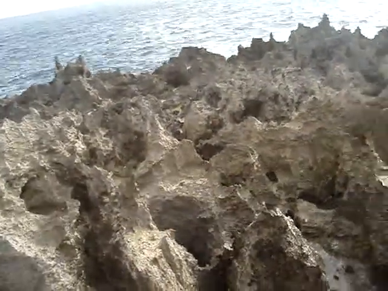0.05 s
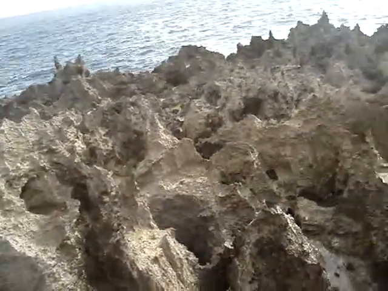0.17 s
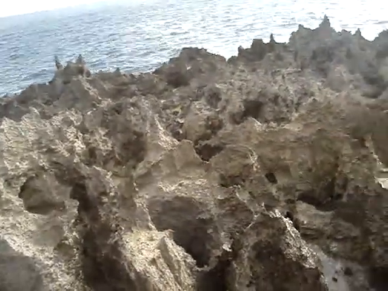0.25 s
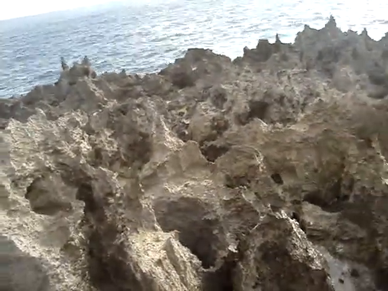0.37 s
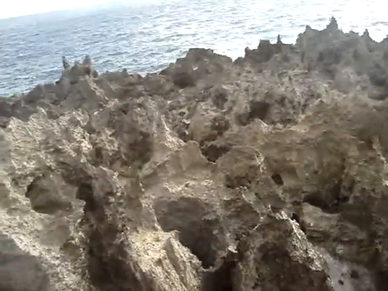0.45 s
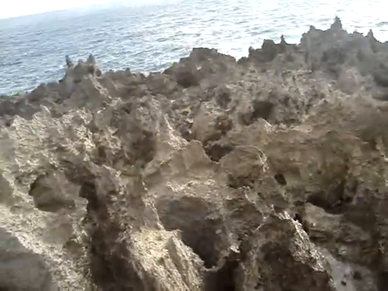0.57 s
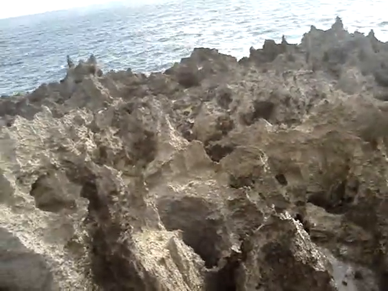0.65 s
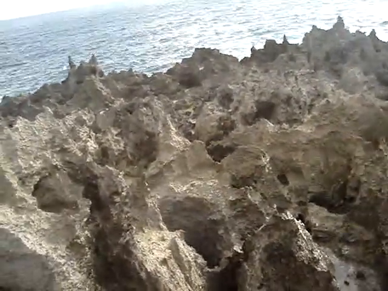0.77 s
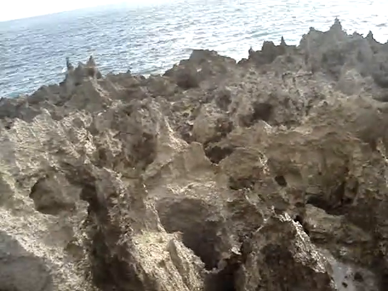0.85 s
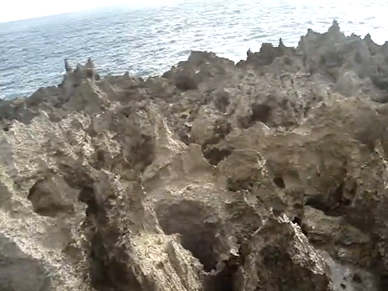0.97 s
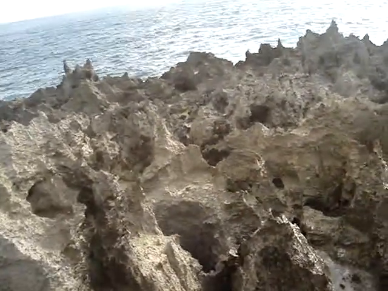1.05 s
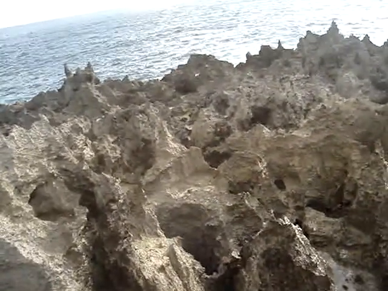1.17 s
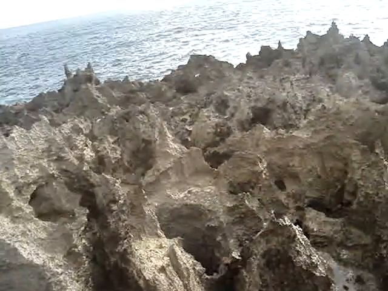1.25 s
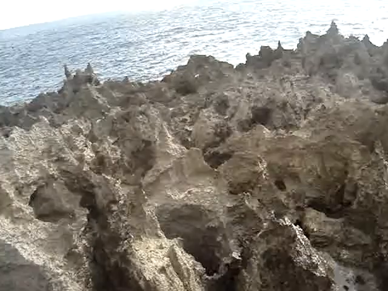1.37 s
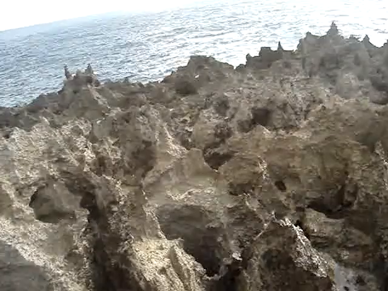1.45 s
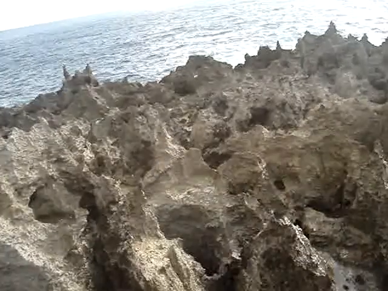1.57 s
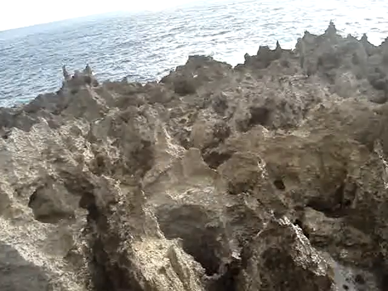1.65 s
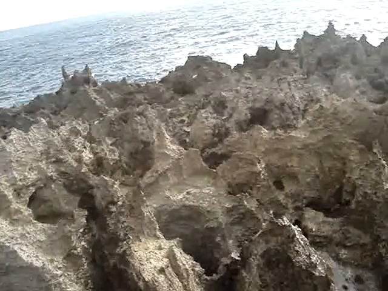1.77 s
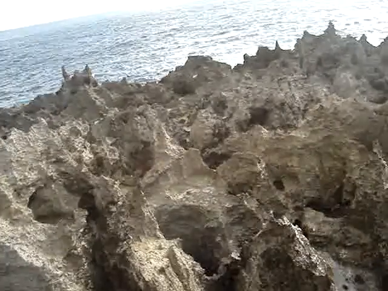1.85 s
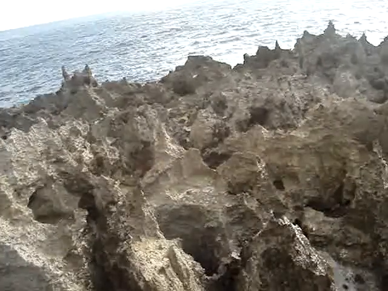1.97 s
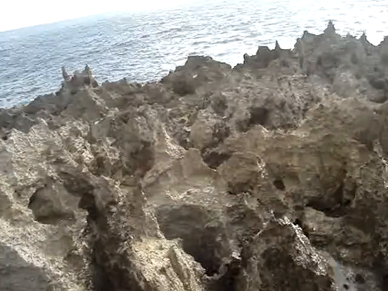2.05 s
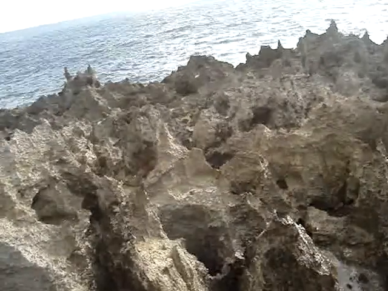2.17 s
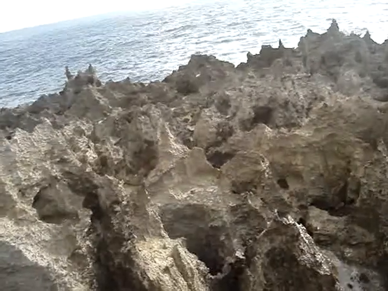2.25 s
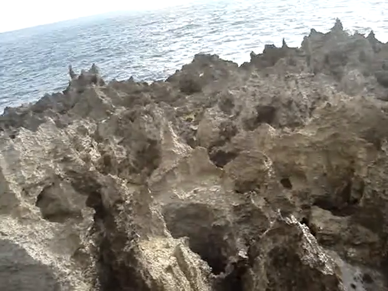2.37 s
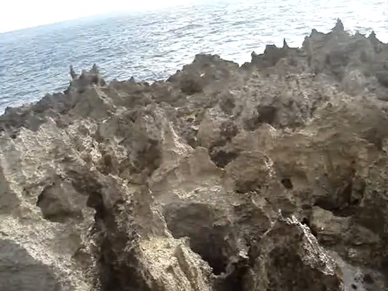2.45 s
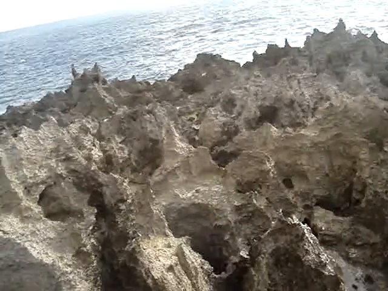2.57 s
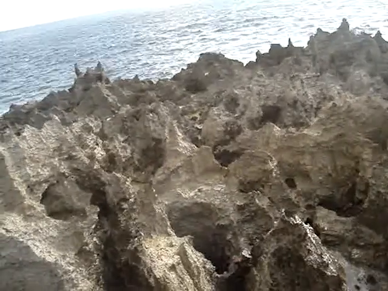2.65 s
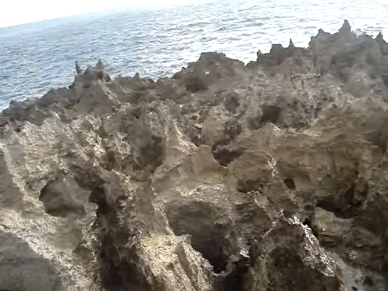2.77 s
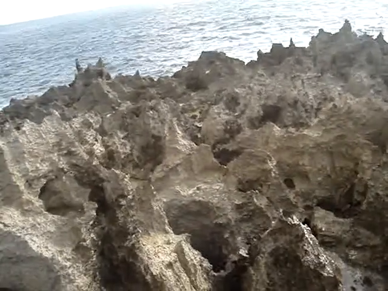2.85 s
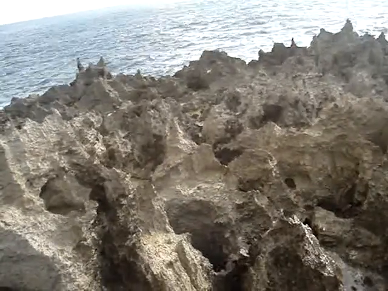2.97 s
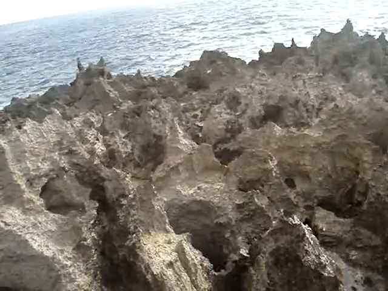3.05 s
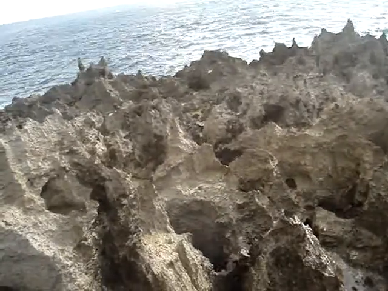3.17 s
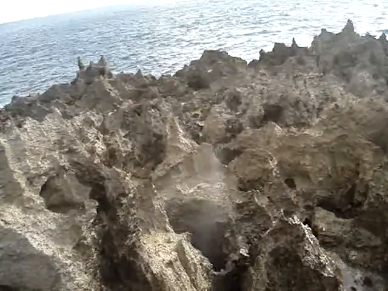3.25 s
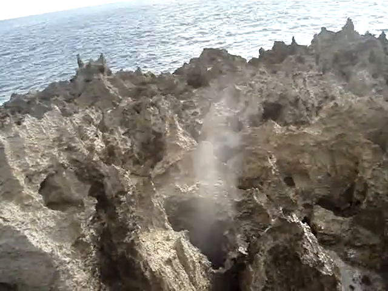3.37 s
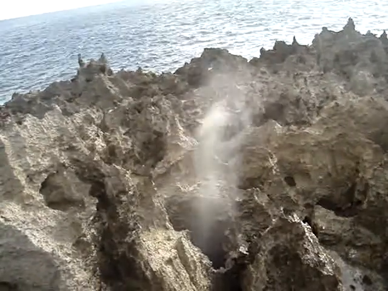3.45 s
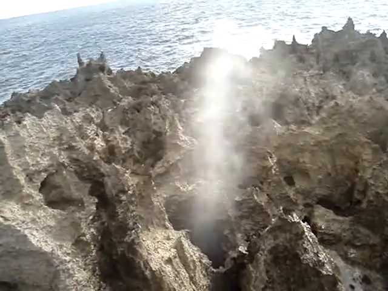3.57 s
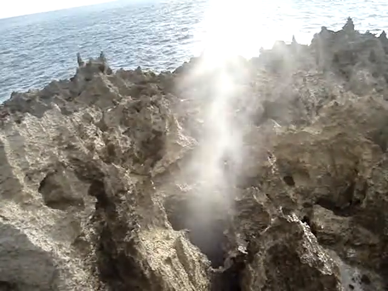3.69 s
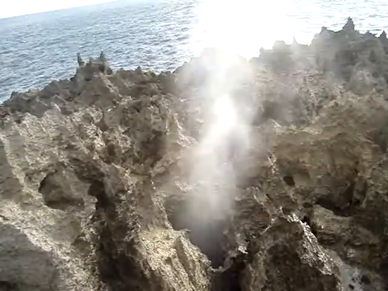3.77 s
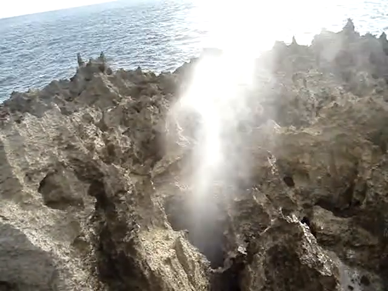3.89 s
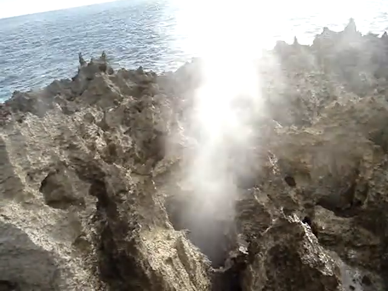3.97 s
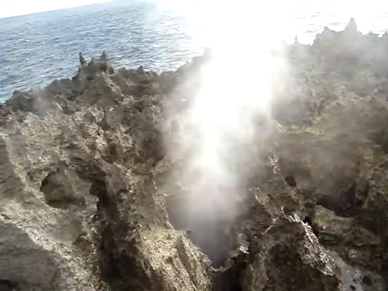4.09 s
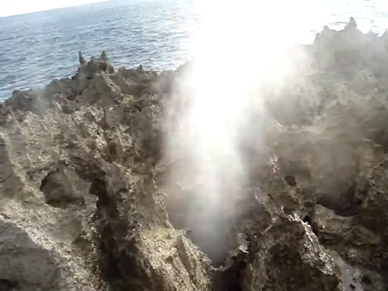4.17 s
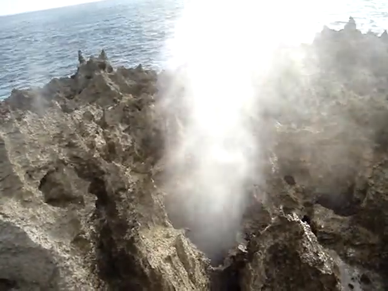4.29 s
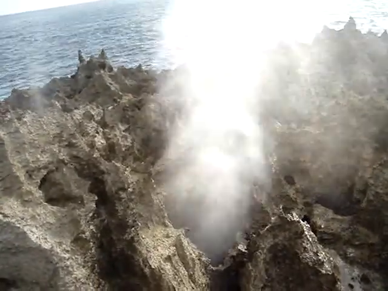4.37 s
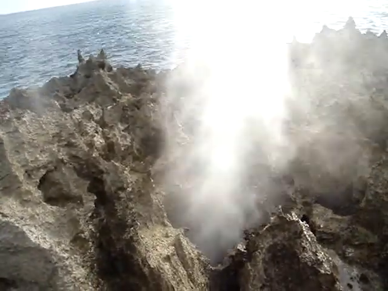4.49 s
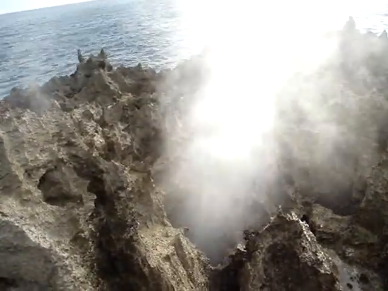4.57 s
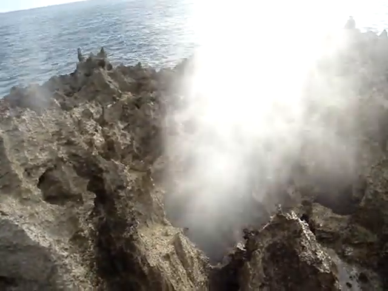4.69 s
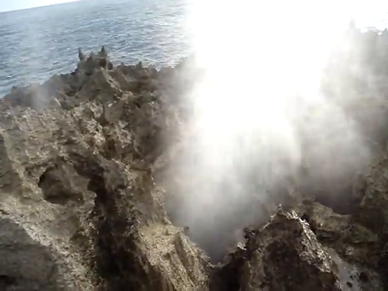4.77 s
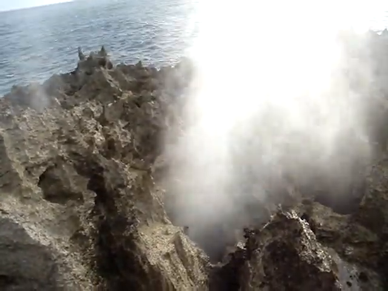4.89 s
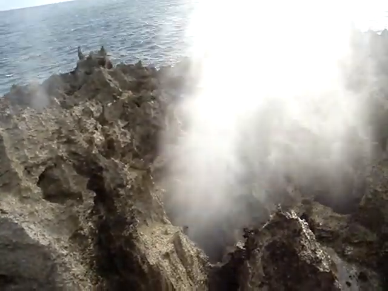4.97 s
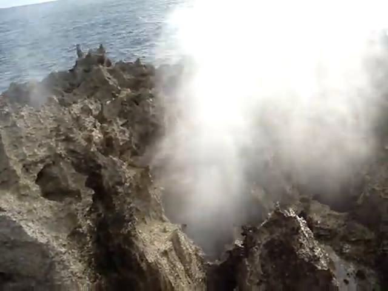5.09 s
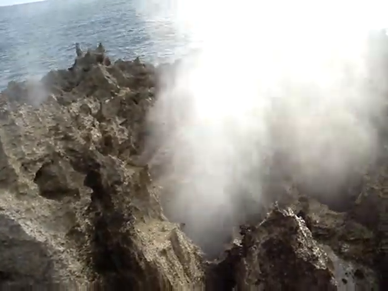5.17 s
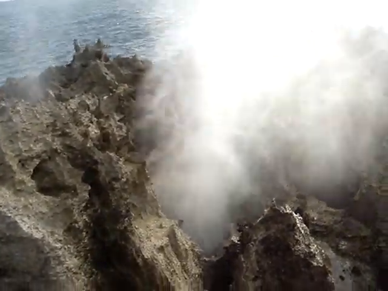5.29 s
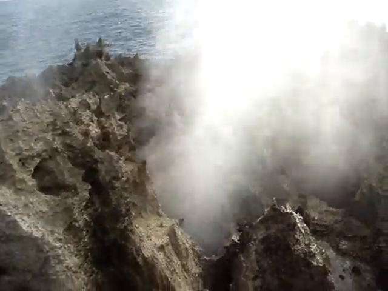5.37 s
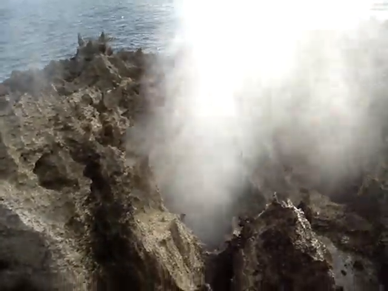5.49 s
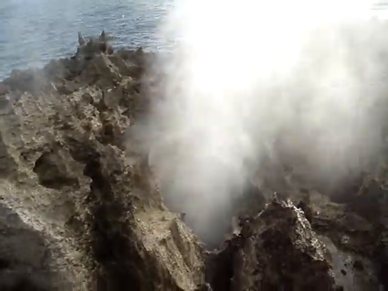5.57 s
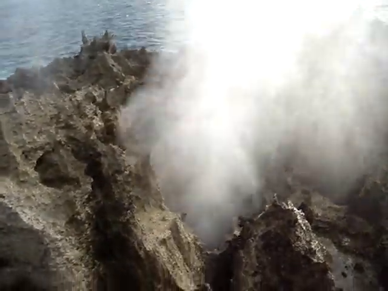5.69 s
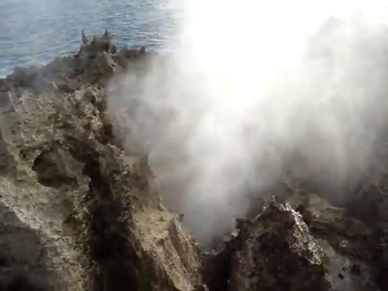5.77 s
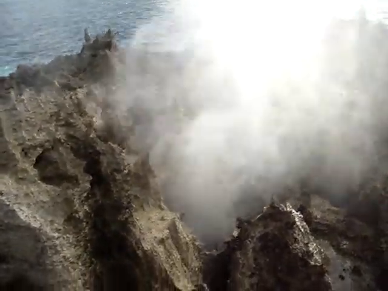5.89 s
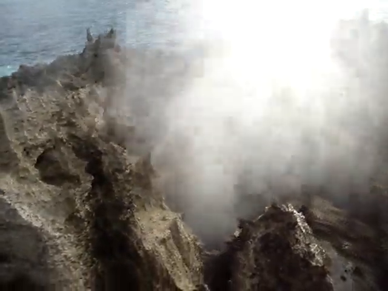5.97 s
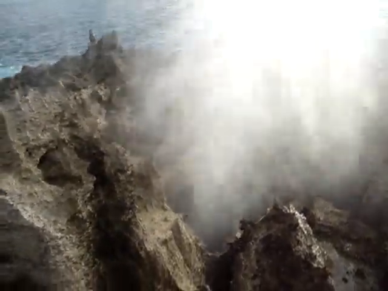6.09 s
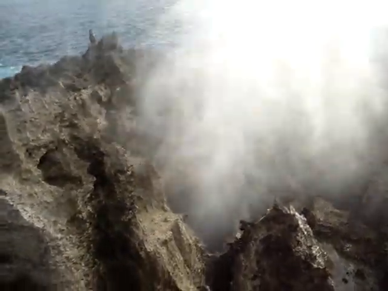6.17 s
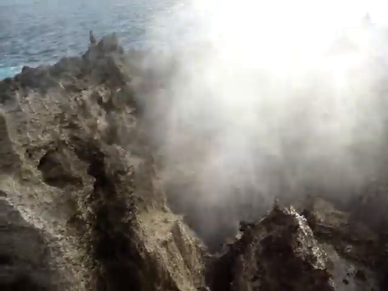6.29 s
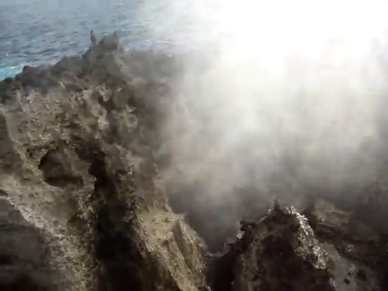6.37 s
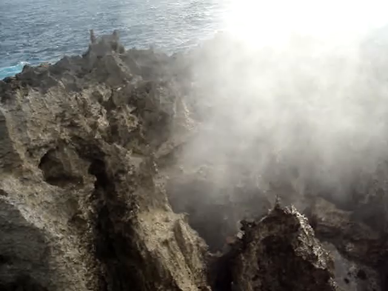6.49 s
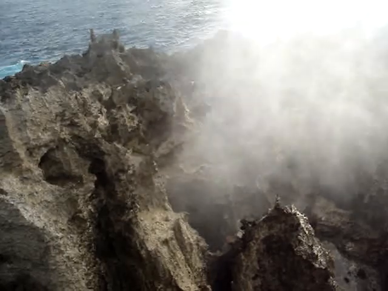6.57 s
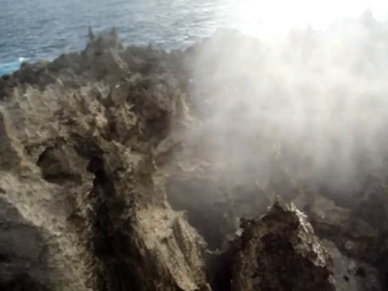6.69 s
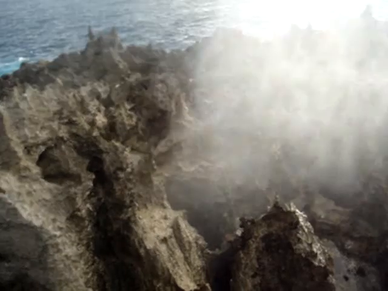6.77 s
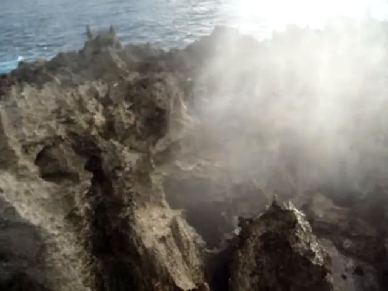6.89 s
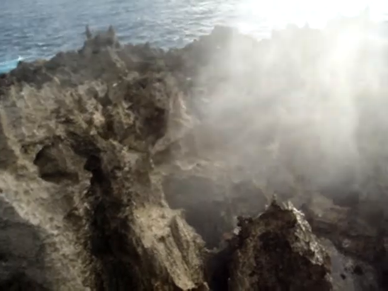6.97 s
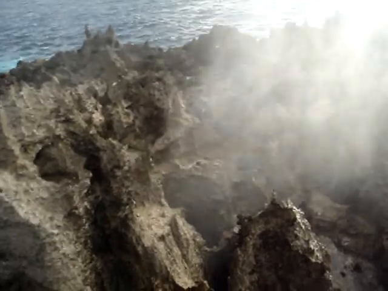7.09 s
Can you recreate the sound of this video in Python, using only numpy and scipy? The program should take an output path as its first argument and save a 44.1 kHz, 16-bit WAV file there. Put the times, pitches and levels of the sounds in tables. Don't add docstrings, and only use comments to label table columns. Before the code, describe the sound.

For the first 2.6 seconds a rocky seashore is quiet: a smooth, distant surf wash, overlapping sheets of fizzing foam, small booms of waves under rock and soft low wind bumps on the microphone, with a barely audible high camera whine. From 2.6 to 3.1 air stirs in a rock hole and swells into a breathy low rush. It climbs steeply after 3.4 and bursts fully by about 3.9, far louder than the sea, with a deep boom and hollow throaty roar. From 4.4 to 5.9 the roar holds nearly steady, booming less and hissing more as water fills the jet. It weakens toward 6.5, sputters in sharp spurts around 6.6 and drops suddenly by 6.7. Draining hiss, low water thumps and a faint wavering hoot near 370 Hz, from 6.8 to 7.05, close it. The sound is slightly gritty, with no extreme treble.

```python
import sys
import numpy as np
from scipy import signal
from scipy.fft import rfft, irfft, next_fast_len
from scipy.io import wavfile
from scipy.ndimage import uniform_filter1d, map_coordinates

SR = 44100
rng = np.random.default_rng(int(sys.argv[2]) if len(sys.argv) > 2 else 0)


def store_wav(level_fs):
    pcm = np.round(np.clip(np.atleast_2d(level_fs), -1, 1) * 32767)
    wavfile.write(sys.argv[1], SR, pcm.T.astype(np.int16))


def invert_db(level):
    return 10 ** (np.asarray(level, dtype=float) / 20)


N = 314874
T = np.arange(N) / SR

# [f/Hz, level/dB per Hz]
SURF_COLOUR = [(110, -37.5), (180, -14.5), (258, -5), (289, -5), (393, -4.5), (844, -0.5), (1110, -8.5),
               (1260, -14.5), (1400, -20.5), (1820, -41.5), (3080, -120)]
# [f/Hz, level/dB per Hz]
FOAM_COLOURS = [
    [(760, -33), (1300, -6), (1440, 1), (1920, -2), (2520, -4), (2770, -6), (3020, -4), (3790, -7),
     (4060, -10), (4420, -8), (4810, -11), (8430, -18.5), (9910, -26), (12900, -52.5), (21800, -120)],
    [(760, -40), (1300, -9), (1550, 0.5), (1750, -6.5), (2040, -3.5), (2520, -9.5), (2790, -7.5),
     (3480, -9.5), (3830, -12.5), (4940, -14.5), (7610, -21), (8290, -22), (9910, -29), (12900, -61),
     (21800, -120)],
]
# [t/s, peak level/dB]
WASHES = [
    (0.15, -46.5),
    (0.55, -49),
    (0.82, -49.5),
    (1.38, -47),
    (1.7, -49),
    (2.05, -47),
    (2.45, -47.5),
    (2.7, -51),
]
# [t/s, peak level/dB]
WAVES = [
    (0.06, -44.5),
    (0.55, -51.5),
    (1.0, -53.5),
    (1.33, -49),
    (2.72, -49),
    (3.96, -26.5),
    (6.68, -39),
]
# [f/Hz, level/dB per Hz]
BUFFET_COLOUR = [(12, -23.5), (25, -7.5), (44, 0), (60, -7), (75, -4), (100, -34), (180, -120)]
# [t/s, peak level/dB]
GUSTS = [
    (0.05, -47),
    (0.85, -55.5),
    (1.3, -47),
    (1.9, -51),
    (2.95, -47),
    (3.95, -40),
    (5.45, -43),
    (5.95, -46),
    (7.14, -45),
]
# [f/Hz, peak level/dB]
WHINE = [(8122, -64.5), (8092, -75), (8153, -79)]
# [t/s, gain level/dB]
DUCK = [
    (2.95, 0),
    (3.3, -8),
    (7.1, -13),
]
# [t/s, peak level/dB, f/Hz]
BUMPS = [(.08, -33, 75), (.51, -38, 45), (.985, -35, 90), (1.105, -34, 110), (1.19, -38, 65),
         (1.27, -37, 85), (1.35, -37, 80), (2.025, -35, 85), (2.72, -36, 70), (6.688, -28, 200),
         (7.041, -27, 200), (7.127, -24, 75)]

# [t/s, flow level/dB, stage: 0 gathering, 1 airy, 2 mixed, 3 wet, 4 draining]
JET = [
    (2.62, -51.5, 0.01),
    (3.13, -33.5, 0.18),
    (3.38, -32.5, 0.63),
    (3.93, -19.5, 1),
    (4.4, -20, 1.86),
    (5.85, -20, 3.1),
    (6.49, -23, 3.01),
    (6.68, -37.5, 3.76),
    (7.14, -39.5, 3.83),
]
# [t/s, level/dB, length/s]
SPUTTER = [
    (3.194, 0, 0.01),
    (3.952, -0.5, 0.047),
    (6.51, 1.5, 0.009),
    (6.556, -0.5, 0.013),
    (6.6, 4.5, .012),
    (6.63, -1.5, 0.018),
]
# [f/Hz, level/dB per Hz]
SHAFT_COLOURS = [
    [(35, -46), (60, -1.5), (86, -2.5), (162, -8), (290, -1.5), (390, -10), (480, -6), (620, -34.5),
     (1060, -120)],
    [(35, -52.5), (60, -6), (107, -6), (146, 0), (319, 0), (436, -7), (480, -13), (620, -35.5),
     (1060, -120)],
    [(35, -37.5), (60, -9.5), (97, -3.5), (130, -2), (305, 2.5), (444, -9.5), (480, -21), (620, -35),
     (1060, -120)],
    [(35, -44), (60, -13.5), (237, 1), (270, 0), (333, -0.5), (440, -12), (480, -8.5), (620, -37),
     (1060, -120)],
    [(35, -30), (60, -5), (339, -1.5), (410, -15), (444, -15.5), (480, -16.5), (620, -39), (1060, -120)],
]
# [f/Hz, level/dB per Hz]
THROAT_COLOURS = [
    [(260, -37), (440, -4), (651, 1), (700, -2.5), (897, -3.5), (1130, -16.5), (1400, -13.5), (1820, -40),
     (3080, -120)],
    [(260, -34), (440, -10.5), (511, -13.5), (591, -3.5), (721, 0.5), (969, -8.5), (1120, -13.5),
     (1400, -16), (1820, -47), (3080, -120)],
    [(260, -42), (440, -14.5), (501, -9.5), (597, 2), (746, 0.5), (830, 1.5), (1040, -6.5), (1400, -13.5),
     (1820, -43), (3080, -120)],
    [(260, -48), (440, -17), (588, -0.5), (684, -3.5), (775, 1.5), (997, -10.5), (1330, -14), (1400, -16.5),
     (1820, -46.5), (3080, -120)],
    [(260, -26), (440, -11.5), (497, -22), (519, -5.5), (826, -0.5), (1400, -12), (1820, -43), (3080, -120)],
]
# [f/Hz, level/dB per Hz]
MIST_COLOUR = [(4300, -37.5), (5000, -1.5), (5250, -4), (5430, -1.5), (5750, -1), (6300, -4), (6650, -5.5),
               (7000, -4), (7700, -6), (8500, -5), (9500, -9), (9900, -10.5), (11000, -36)]
# [f/Hz, width/Hz, level/dB]
GATHERING = [(1600, 170, 6.5), (2170, 250, 4), (2630, 360, -0.5), (3300, 700, -4), (4300, 900, -10.5)]
AIRY = [(1656, 180, 9), (2250, 540, 3), (2650, 340, 1.5), (3170, 290, 1), (3860, 520, -3),
        (4460, 360, -3.5), (5100, 510, -4)]
MIXED = [(1596, 200, 8), (2206, 250, 2.5), (2660, 610, 0), (3110, 390, -4), (3780, 440, -3),
         (4490, 360, -4.5), (5130, 260, -2.5)]
WET = [(1550, 250, 7), (2030, 210, 4.5), (2595, 250, 4.5), (3100, 290, -1), (3620, 350, -3),
       (4190, 330, -3), (4800, 540, -7)]
DRAINING = [(1610, 310, 5), (2200, 450, 0.5), (2480, 150, -3), (2700, 180, -1.5), (3220, 500, -5.5),
            (3950, 530, -6), (4580, 800, -9)]
BOOM_DB = (1.9, -0.1, -5, -5, 2.5)
SPRAY_DB = (-10.5, -9, -6.5, -5, -1.9)
MIST_DB = (-20, -17, -14.5, -13, -10)
THUD_DB = (-15, -18, -25, -30, -16)
# [t/s, f/Hz, level/dB]
HOOT = [
    (6.82, 378, -45),
    (6.845, 378, -39),
    (6.92, 370, -41),
    (6.97, 362, -45),
    (7.0, 374, -40),
    (7.035, 372, -37),
    (7.05, 370, -42),
]
# [f/Hz, level/dB]
BAND_LIMIT = [(9700, 0.5), (9950, -1.5), (10080, -3), (10200, -62), (10300, -120)]


def unit(x):
    return x / np.sqrt(np.mean(x ** 2) + 1e-20)


def along(points, hz):
    f, v = np.transpose(points)
    return np.interp(np.log(hz + 1), np.log(f + 1), v)


def curves(rows, before=None):
    times, *columns = np.transpose(rows)
    return [np.interp(T, times, column, left=before) for column in columns]


def wobble(rate):
    knots = rng.standard_normal(int(N * rate / SR) + 4)
    return map_coordinates(knots, [T * rate])


def filtered(x, response):
    m = next_fast_len(N + 8192)
    spectrum = rfft(x, m) * response(np.fft.rfftfreq(m, 1 / SR))
    return irfft(spectrum, m)[..., :N]


def turbulence(patchy_db):
    noise = signal.stft(rng.standard_normal(N), nperseg=512)[2]
    patches = uniform_filter1d(rng.standard_normal(noise.shape), size=6, axis=0)
    patches = uniform_filter1d(patches, size=10, axis=1)
    return signal.istft(noise * invert_db(patchy_db * unit(patches)), nperseg=512)[1][:N]


def rush(colour, patchy_db):
    return unit(filtered(turbulence(patchy_db), lambda hz: invert_db(along(colour, hz))))


def surges(rows, rest_db, rise_s, fall_s):
    power = invert_db(rest_db) ** 2
    for s, db in rows:
        length = np.where(T < s, rise_s, fall_s)
        power = power + invert_db(db) ** 2 * np.exp(-((T - s) / length) ** 2)
    return np.sqrt(power)


def surf():
    duck_db = 0.23 * curves(DUCK)[0]
    return invert_db(-37 + duck_db + 0.35 * wobble(2.2)) * rush(SURF_COLOUR, patchy_db=0.0)


def foam():
    turn = np.pi / 2 * np.clip((T - 1.1) / 0.5, 0, 1)
    first = np.cos(turn) * rush(FOAM_COLOURS[0], patchy_db=0.8)
    second = np.sin(turn) * rush(FOAM_COLOURS[1], patchy_db=0.36)
    swell = surges(WASHES, rest_db=-44.5, rise_s=0.14, fall_s=0.2)
    return swell * invert_db(0.2 * wobble(8.0)) * (first + second)


def waves():
    swell = surges(WAVES, rest_db=-55.5, rise_s=0.12, fall_s=0.2)
    colour = [(45, -45.5), (70, -2), (130, -1), (200, -4), (280, -36.5)]  # Hz, dB per Hz
    return swell * invert_db(1.6 * wobble(25)) * rush(colour, patchy_db=2.0)


def wind():
    swell = surges(GUSTS, rest_db=-62.5, rise_s=0.12, fall_s=0.18)
    return swell * unit(invert_db(0.8 * wobble(12)) * rush(BUFFET_COLOUR, patchy_db=1.2))


def motor_whine():
    tones = sum(invert_db(db + 0.4 * wobble(7.2)) * np.sin(2 * np.pi * hz * T) for hz, db in WHINE)
    return invert_db(curves(DUCK)[0]) * tones


def bumps():
    pushes = 0
    for s, db, hz in BUMPS:
        cycles = (T - s) * hz
        pushes = pushes + invert_db(db) * np.exp(-(cycles / 0.42) ** 2) * np.sin(-2 * np.pi * cycles)
    return pushes


def jet(stage_db, lead_s=0):
    flow_db, stage = curves(JET, before=-88)
    level_db = flow_db + np.interp(stage, np.arange(len(stage_db)), stage_db)
    earlier_db = np.interp(T + lead_s, T, level_db)
    return np.minimum(level_db, earlier_db)


def staged(layers):
    stage = np.clip(curves(JET)[1], 0, 4)
    return sum(np.clip(1 - np.abs(stage - k), 0, 1) * unit(x) for k, x in enumerate(layers))


def coloured(air, colours):
    return staged(filtered(air, lambda hz: invert_db(along(colour, hz))) for colour in colours)


def boom(flutter):
    return invert_db(jet(BOOM_DB) + 0.36 * flutter) * coloured(turbulence(patchy_db=0.26), SHAFT_COLOURS)


def roar(flutter, slugs_db):
    level_db = jet([0]) + slugs_db + 0.15 * flutter
    return invert_db(level_db) * coloured(turbulence(patchy_db=0.57), THROAT_COLOURS)


def mist(flutter):
    return invert_db(jet(MIST_DB, lead_s=0.035) + 0.28 * flutter) * rush(MIST_COLOUR, patchy_db=1.2)


def thud():
    return invert_db(jet(THUD_DB) + 1.1 * wobble(5.8)) * rush(BUFFET_COLOUR, patchy_db=0.7)


def rock_response(modes):
    def response(f):
        power = 0
        for centre, width, db in modes:
            offset = np.abs((f * f - centre * centre) / (f * width + 1e-9))
            power = power + invert_db(db) ** 2 / (1 + offset ** 2.7)
        return np.sqrt(power)
    return response


def spray(flutter, slugs_db):
    colour = [(1100, -46.5), (1400, -1.7), (4900, 4.5), (5600, -8.0), (6600, -25.5)]  # Hz, dB
    hiss = filtered(turbulence(patchy_db=0.5), lambda hz: invert_db(along(colour, hz)))
    stages = (GATHERING, AIRY, MIXED, WET, DRAINING)
    rocks = staged(filtered(hiss, rock_response(modes)) for modes in stages)
    return invert_db(jet(SPRAY_DB, lead_s=0.021) + 0.48 * slugs_db + 0.37 * flutter) * rocks


def blowhole():
    flutter = wobble(12)
    slugs_db = sum(db * np.exp(-((T - s) / length) ** 2) for s, db, length in SPUTTER)
    air = boom(flutter) + roar(flutter, slugs_db)
    return air + mist(flutter) + thud() + spray(flutter, slugs_db)


def backdraw():
    hz, db = curves(HOOT)
    gate = np.clip(np.minimum(T - HOOT[0][0], HOOT[-1][0] - T) / 0.0063, 0, 1)
    level = invert_db(db + 3 + 0.8 * wobble(40))
    unsteady_hz = hz * (1 + 0.006 * wobble(60))
    return gate * level * np.sin(2 * np.pi * np.cumsum(unsteady_hz) / SR)


def scene():
    shore = surf() + foam() + waves() + wind()
    return (shore + motor_whine() + bumps() + blowhole() + backdraw())[None]


def coarse_storage(x):
    n, k = np.arange(512) - 255.5, np.arange(32)[:, None]
    lowpass = signal.firwin(512, 0.0177, window=("kaiser", 9))
    bank = lowpass * np.cos((2 * k + 1) * np.pi / 64 * n - (-1) ** k * np.pi / 4)
    slow = np.pad(signal.resample_poly(x, 320, 441), (512, 2048))
    frames = np.lib.stride_tricks.sliding_window_view(slow, 512)[::32]
    whole = len(frames) // 36 * 36
    blocks = (frames[:whole] @ bank.T).reshape(-1, 36, 32)
    peak = np.abs(blocks).max(axis=1, keepdims=True)
    step = 2.2 * peak / np.where(k.T < 10, 15, 3) + 1e-12
    rounded = np.round(blocks / step) * step
    pieces = 128 * rounded.reshape(-1, 32) @ bank
    place = 32 * np.arange(len(pieces))[:, None] + np.arange(512)
    joined = np.bincount(place.ravel(), pieces.ravel())[512:]
    return signal.resample_poly(joined, 441, 320)[:N]


def low_pass(x):
    return signal.sosfilt(signal.butter(12, 10060, fs=SR, output="sos"), x)


def record(dry):
    ceiling = np.where(dry > 0, 0.56, 0.66)
    saturated = dry / (1 + np.abs(dry / ceiling) ** 4) ** (1 / 4)
    stored = coarse_storage(saturated[0])[None]
    limited = filtered(stored, lambda hz: invert_db(along(BAND_LIMIT, hz)))
    return low_pass(limited)


dry = scene()
out = record(dry)
store_wav(out)
```